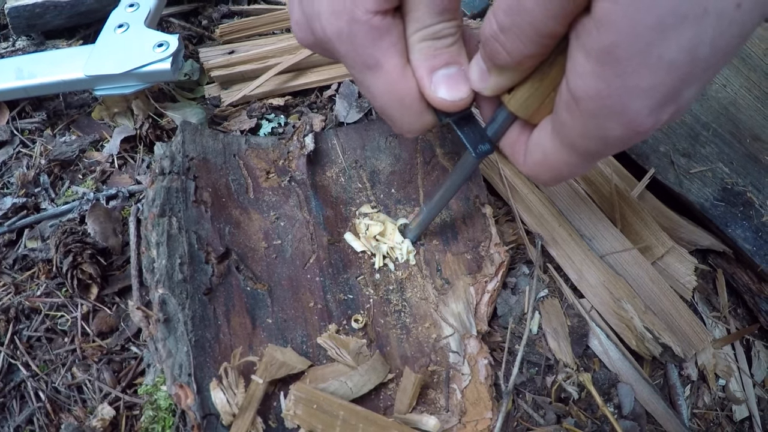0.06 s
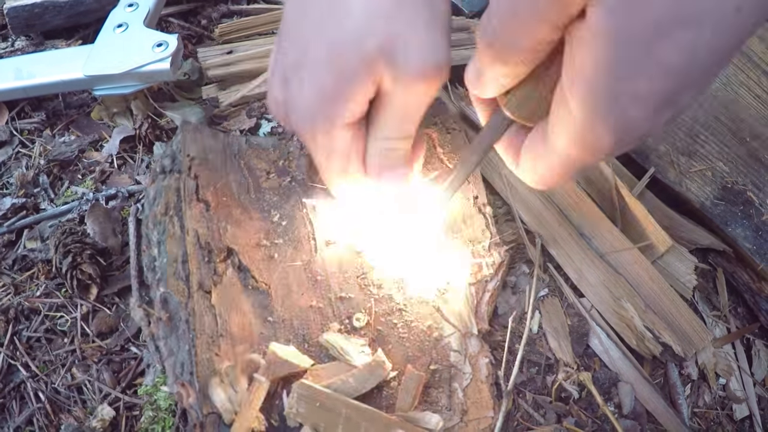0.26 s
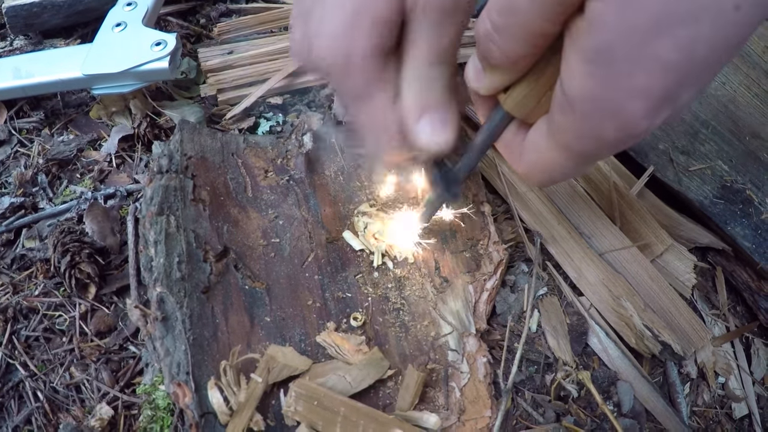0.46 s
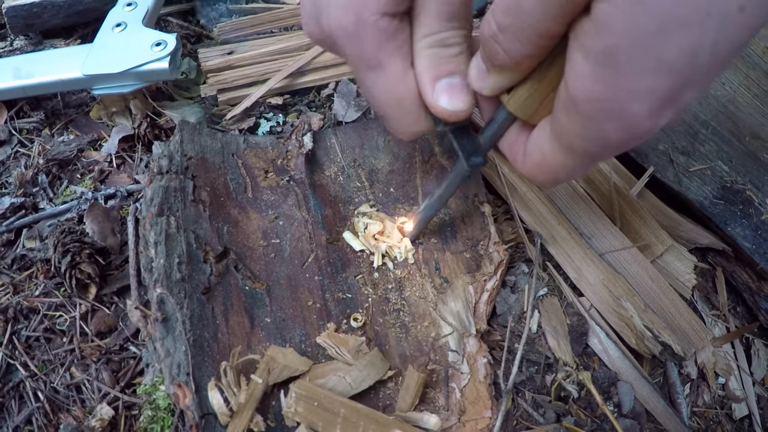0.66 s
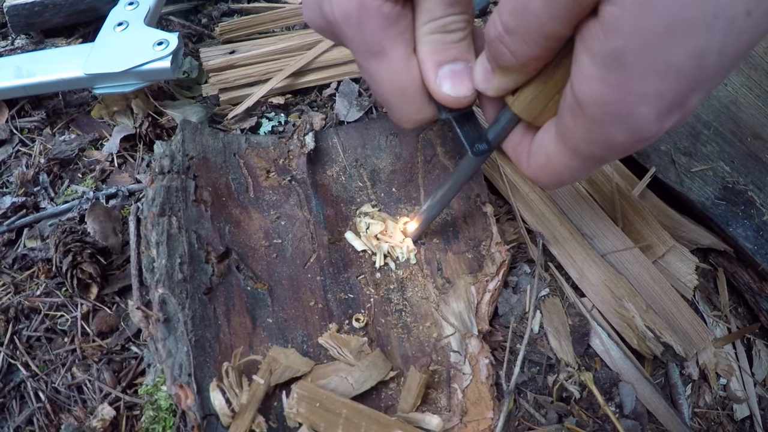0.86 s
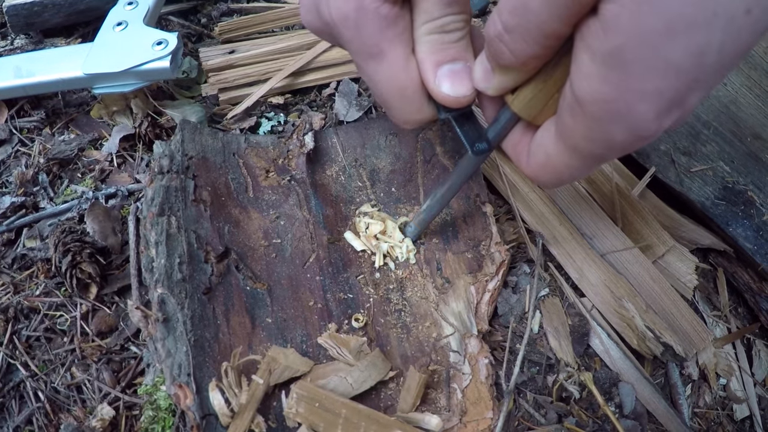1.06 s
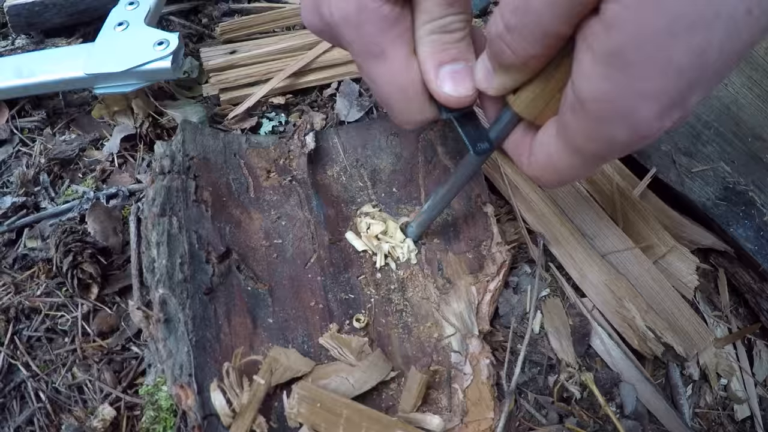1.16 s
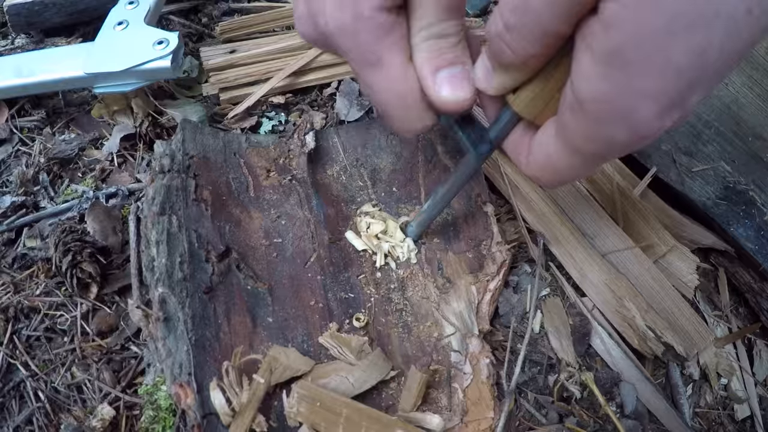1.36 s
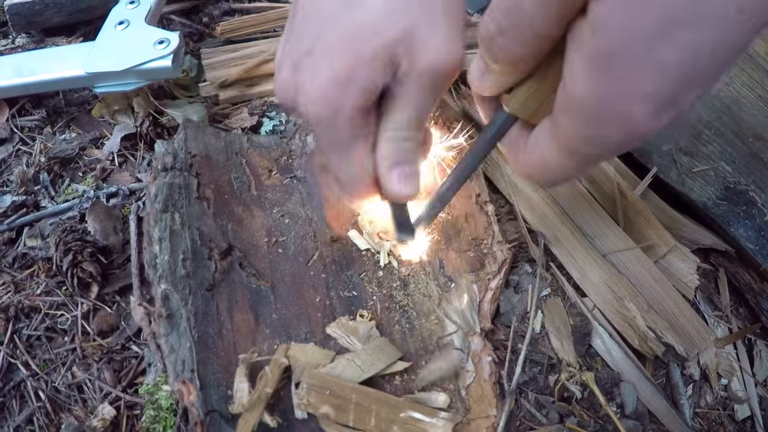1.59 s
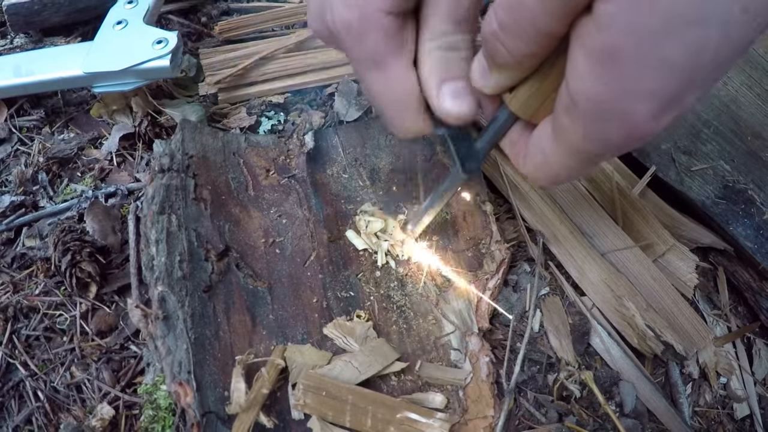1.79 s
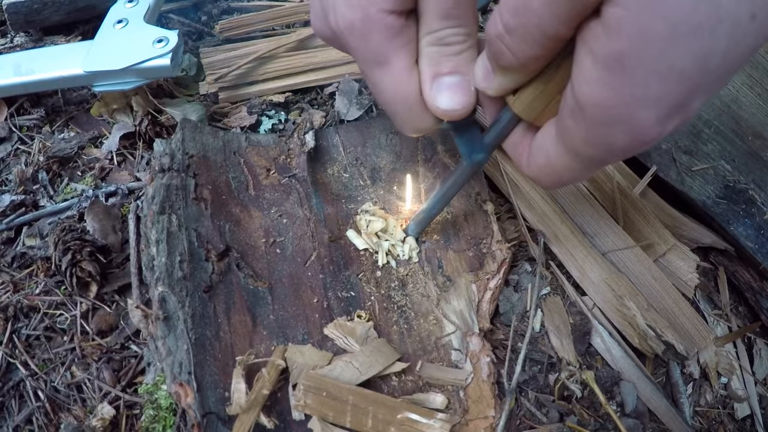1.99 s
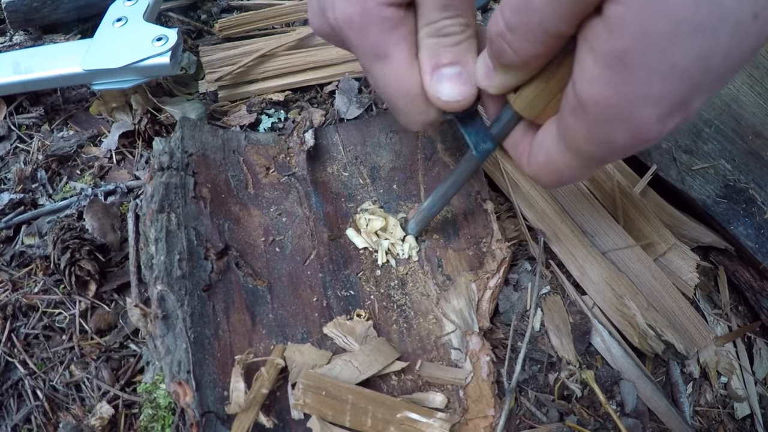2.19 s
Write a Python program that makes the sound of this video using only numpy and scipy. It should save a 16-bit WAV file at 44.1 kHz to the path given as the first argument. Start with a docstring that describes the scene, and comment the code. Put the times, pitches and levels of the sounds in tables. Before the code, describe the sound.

Fire steel strokes heard very close and dry outdoors: soft hand knocks on bark, a scrape flaring into crackling sparks, a near pause, then a second harder stroke, a tiny squeak and stray sputters.

```python
"""Quiet forest floor, microphone close to a fire steel: faint air and a low rumble lie under the take.
First the hands knock and rub on bark, and the striker slides down the rod with a thin hiss of slips.
Then it bites: the shavings flare as rasping fizz and whoosh, and burn off in a shower of noise bursts.
Stray sparks sputter and pop during and after it, and a second stroke slides, flares and showers again.
As that shower thins, a high wavering tone squeaks as the striker is drawn back; last stray sparks follow."""
import sys
import numpy as np
from scipy import signal
from scipy.fft import rfft, irfft, next_fast_len
from scipy.io import wavfile
from scipy.ndimage import uniform_filter1d, map_coordinates

SR = 44100
rng = np.random.default_rng(int(sys.argv[2]) if len(sys.argv) > 2 else 0)


def store_pcm(level_fs):
    """Save levels as 16-bit WAV."""
    pcm = np.round(np.clip(level_fs, -1, 1) * 32767).astype(np.int16)
    wavfile.write(sys.argv[1], SR, np.atleast_2d(pcm).T)


N = 98828
T = np.arange(N) / SR  # time (s)
FLICKER_DB = 1.5  # random level flicker shared by flares and showers


def amp(db):
    """Decibels to gain."""
    return 10 ** (np.asarray(db) / 20)


def unit(x):
    """Scaled to rms 1."""
    return x / np.sqrt(np.mean(x ** 2) + 1e-20)


def wobble(rate):
    """A smooth random curve, rate knots a second."""
    knots = rng.standard_normal(int(N * rate / SR) + 4)
    return map_coordinates(knots, [T * rate])


def level_curve(rows):
    """Level in dB drawn through (t/s, level/dB) rows, as good as silent outside them."""
    return np.interp(T, *np.transpose(rows), left=-120, right=-120)


def ring(points, size=8192):
    """Causal minimum-phase impulse response of energy 1 with the given (f/Hz, level/dB) spectrum."""
    hz, db = np.transpose(points)
    f = np.fft.rfftfreq(size, 1 / SR) + 1
    gain = amp(np.interp(np.log(f), np.log(hz + 1), db))
    # folding the cepstrum forward in time makes the response causal
    cepstrum = irfft(np.log(np.maximum(gain, 1e-6)))
    cepstrum[1:size // 2] *= 2
    cepstrum[size // 2 + 1:] = 0
    response = irfft(np.exp(rfft(cepstrum)))
    return response / np.linalg.norm(response)


def through(x, response):
    """x convolved with a response."""
    return signal.fftconvolve(x, response)[:N]


def lowpass(x, hz):
    """Second-order low-pass."""
    sos = signal.butter(2, min(hz, SR / 2 - 1), fs=SR, output='sos')
    return signal.sosfilt(sos, x)


def noise(points):
    """Coloured noise of rms 1."""
    response = ring(points)
    white = rng.standard_normal(N + len(response) - 1)
    return unit(signal.fftconvolve(white, response, 'valid'))


def grains(per_s, spread_db, even_s=0.0036):
    """Random impulses of uneven size, with rms near 1 over every even_s."""
    hit = rng.random(N) < per_s / SR
    size = amp(spread_db * np.clip(rng.standard_normal(N), -2, 2))
    x = hit * size * np.sign(rng.standard_normal(N))
    power = np.abs(uniform_filter1d(x ** 2, max(int(even_s * SR), 2)))
    return x / np.sqrt(power + 1e-4)


def gate(start, length, attack, release):
    """Linear attack, hold until start + length, exponential release."""
    fade = np.exp(-np.maximum(T - start - length, 0) / release)
    return np.clip((T - start) / attack, 0, 1) * fade


def swell(peak, rise, fall):
    """Exponential rise and fall around a peak."""
    return np.exp(-np.maximum((peak - T) / rise, (T - peak) / fall))


# borders between big dull sparks and small bright ones: f/Hz
REGISTER_BORDERS = [900, 1900, 3400, 5500, 9500]


def patchwork(source):
    """A fresh draw of the source in each register, so that its colour keeps shifting."""
    size = next_fast_len(N + SR // 8)
    f = np.fft.rfftfreq(size, 1 / SR)
    # share of the power that lies below each border
    below = [0 * f] + [1 / (1 + (f / hz) ** 6) for hz in sorted(REGISTER_BORDERS)] + [1 + 0 * f]
    total = np.zeros(N)
    for lower, upper in zip(below, below[1:]):
        band_gain = np.sqrt(np.abs(upper - lower))
        total += irfft(rfft(source(), size) * band_gain, size)[:N]
    return total


# still air among the trees: f/Hz, level/dB per Hz
AIR_SPECTRUM = [(150, -43), (250, -11.5), (434, -4), (781, -10.5), (837, -10.5), (1950, -10), (2160, -10),
                (2490, -10.5), (8620, -20), (15500, -26.5)]
# low rumble under the air: f/Hz, level/dB per Hz
RUMBLE_SPECTRUM = [(12, -42), (20, -10), (38, 2), (103, -3.5), (140, -7.5), (177, -14), (219, -20),
                   (245, -20), (400, -24.5), (520, -76), (880, -120)]
AIR_DB, RUMBLE_DB = -51.5, -39.5


def forest_floor():
    """Still air and a low rumble, two coloured noises whose levels drift a little."""
    air = amp(AIR_DB + 1.1 * wobble(3.06)) * noise(AIR_SPECTRUM)
    rumble = amp(RUMBLE_DB + 0.59 * wobble(8.26)) * noise(RUMBLE_SPECTRUM)
    return air + rumble


def tail(t60):
    """A dying scatter of echoes as decaying noise, energy 1; t60 is the time to fall 60 dB (s)."""
    t = T[:SR // 2]
    scatter = rng.standard_normal(len(t)) * amp(-60 * t / t60) * (t > .0003)
    return scatter / np.linalg.norm(scatter)


NEAR_DB, NEAR_T60_S = -12, 0.014
WOODS_DB, WOODS_T60_S = -24, 0.3


def echoes(close_sound):
    """A short scatter off hands and bark, and the longer, fainter answer of the trees."""
    near = amp(NEAR_DB) * through(close_sound, tail(NEAR_T60_S))
    woods = amp(WOODS_DB) * through(close_sound, tail(WOODS_T60_S))
    return near + woods


# the hands bump the bark: t/s, level/dB, low-pass corner f/Hz
BUMPS_ON_BARK = [(0.028, -31.5, 120), (.105, -33.5, 127), (.262, -23, 202), (1.18, -45, 1500),
                 (1.39, -39.5, 2000), (1.521, -12.5, 600), (2.07, -40.5, 1800)]
# the knocked bark: f/Hz, level/dB per Hz
BARK_SPECTRUM = [(30, -25), (90, -2), (160, 8), (280, -1), (450, -2), (1100, -2), (3000, -7)]
# the hands rub and shift on the wood: start t/s, length/s, level/dB
RUBS_ON_WOOD = [(0.136, 0.44, -39), (.69, .08, -52.5), (1.398, 0.29, -35), (1.712, 0.15, -44)]
# the rubbing: f/Hz, level/dB per Hz
RUB_SPECTRUM = [(60, -1.5), (150, 4.5), (270, -5), (430, -2), (600, -9.5), (850, -7), (1400, -12.5),
                (3000, -31.5)]
BUMP_FALL_S, RUB_ATTACK_S, RUB_RELEASE_S = 0.0042, .015, 0.032


def hands():
    """Knocks and soft rubbing on the slab of bark: short low-passed and longer uneven noise."""
    knocks = np.zeros(N)
    for start, db, corner_hz in BUMPS_ON_BARK:
        thud = unit(lowpass(noise(BARK_SPECTRUM), corner_hz))
        knocks += thud * amp(db) * gate(start, 0.0053, 0.0013, BUMP_FALL_S)
    rubbing = sum(amp(db) * gate(start, length, RUB_ATTACK_S, RUB_RELEASE_S)
                  for start, length, db in RUBS_ON_WOOD)
    return knocks + rubbing * amp(1.2 * wobble(49.7)) * noise(RUB_SPECTRUM)


# the squeak: t/s, pitch f/Hz, level/dB
SQUEAK_COURSE = [(1.714, 7860, -48), (1.717, 7670, -12), (1.721, 7640, -14.5), (1.726, 7850, -13.5),
                 (1.734, 7950, -25), (1.742, 7580, -41)]
SQUEAK_WAVER_HZ, OVERTONE_DB = 170, -12  # random pitch waver; octave relative to the fundamental


def squeak():
    """Steel that sticks and slips for a moment: a high wavering sine and its octave."""
    s, hz, db = np.transpose(SQUEAK_COURSE)
    pitch_hz = np.interp(T, s, hz) + SQUEAK_WAVER_HZ * wobble(600)
    phase = 2 * np.pi * np.cumsum(pitch_hz) / SR
    level = amp(level_curve(np.transpose([s, db])) + wobble(403))
    tone = np.sin(phase) + amp(OVERTONE_DB) * np.sin(2 * phase)
    return np.sqrt(2) * level * tone  # sqrt(2) gives the fundamental an rms of level


# the striker sliding on the rod: start t/s, length/s, mid-slide level/dB
STRIKER_SLIDES = [(0.154, 0.1, -21.5), (1.399, .08, -24.5)]
# rod and striker: f/Hz, level/dB per Hz
STEEL_SPECTRUM = [(100, -2.5), (300, -1), (600, -2.5), (850, -0.5), (1200, -2.5), (1750, -14), (2300, -11),
                  (2600, -4.5), (3100, -13), (3900, 1), (4400, -3), (5100, 4.5), (5700, -5.5), (6600, 0.5),
                  (8200, -12.5), (10000, -4), (11300, -9.5), (13500, -2.5), (15500, -9.5)]
SLIDE_ATTACK_S, SLIDE_RELEASE_S, SLIDE_SWELL_DB_PER_S = 0.014, 0.013, 25
SLIDE_TREBLE_HZ, TREBLE_ATTACK_S = 8000, 0.034  # the treble comes in as the striker gathers speed


def slide():
    """Fine slips of the striker's edge ring the steel, louder and brighter as it gathers speed."""
    force, speed = np.zeros(N), np.zeros(N)
    for start, length, db in STRIKER_SLIDES:
        from_middle = np.clip(T - start - length / 2, -length, length / 2)
        level = amp(db + SLIDE_SWELL_DB_PER_S * from_middle)
        force += level * gate(start, length, SLIDE_ATTACK_S, SLIDE_RELEASE_S)
        speed += gate(start, 2 * length, TREBLE_ATTACK_S, SLIDE_RELEASE_S)
    texture = patchwork(lambda: amp(3.5 * wobble(90)) * grains(6000, spread_db=5.5))
    slips = force * amp(1.2 * wobble(130)) * texture
    # low-passed forwards and backwards, so that dull and treble stay aligned
    dull = lowpass(lowpass(slips, SLIDE_TREBLE_HZ)[::-1], SLIDE_TREBLE_HZ)[::-1]
    treble = slips - dull
    return through(dull + speed * treble, ring(STEEL_SPECTRUM))


# stray sparks that sputter: start t/s, length/s, crackle level/dB, sizzle level/dB
STRAY_SPUTTERS = [(0.665, 0.0062, -26.5, -33.5), (.674, 0.0047, -30, -39), (0.697, 0.0033, -40, -46),
                  (0.732, 0.011, -46.5, -75), (0.857, 0.013, -48.5, -53), (0.89, 0.0056, -39.5, -44),
                  (1.7682, 0.0029, -17.5, -31), (1.785, 0.004, -23.5, -32), (1.82, 0.017, -23, -31),
                  (1.841, 0.015, -39.5, -47), (1.875, 0.0089, -41, -46), (1.924, .004, -38, -54),
                  (2.002, 0.0047, -21.5, -39), (2.014, 0.0093, -18, -39), (2.025, 0.016, -33, -50),
                  (2.069, 0.0032, -39.5, -50), (2.2115, .001, -50, -36.5), (2.2365, 0.0017, -29.5, -36)]
# single sparks that burst: t/s, peak level/dB
STRAY_POPS = [(0.3284, 0), (0.3455, 2), (0.389, -2), (0.3985, 5.5), (0.4541, -2), (.498, 0.5), (0.5227, 11),
              (0.5288, -8), (0.5487, -5), (0.5698, 1.5), (0.5843, -7.5), (0.6668, -5), (1.4264, -6.5),
              (1.482, 7), (1.5996, 1), (1.6156, 13), (1.636, -14), (1.682, -10), (1.8034, -8), (1.8254, -2),
              (1.8317, -0.5), (1.8613, -20), (1.928, -20), (2.0039, -22), (2.0157, 1), (2.0209, 5.5)]
# a sputtering spark: f/Hz, level/dB per Hz
SNAP_SPECTRUM = [(100, -15), (700, -12), (1100, -4.5), (1700, -1), (2500, -7), (4200, 2), (5900, -5.5),
                 (7500, -3), (8800, -22), (15500, -17)]
# the burst of a single spark: f/Hz, level/dB per Hz
CRACK_SPECTRUM = [(100, -39), (700, -23), (1300, -2), (2500, -2), (4200, 3.5), (6500, -1), (9000, -10),
                  (15500, -10.5)]
# the smallest sparks, here and in the showers: f/Hz, level/dB per Hz
SIZZLE_SPECTRUM = [(2000, -30), (7000, -15), (10000, 6), (12000, 3), (15500, -3)]
SPUTTER_ATTACK_S, SPUTTER_FALL_S, SPUTTER_PER_S = 0.00026, .0015, 2500  # last: impulses a second


def strays():
    """Lone sparks: short runs of impulses with a thin noise sizzle, and single sharp pops."""
    crackle_level, sizzle_level = np.zeros(N), np.zeros(N)
    for start, length, crackle_db, sizzle_db in STRAY_SPUTTERS:
        envelope = gate(start, length, SPUTTER_ATTACK_S, SPUTTER_FALL_S)
        crackle_level += amp(crackle_db) * envelope
        sizzle_level += amp(sizzle_db) * envelope
    snaps = crackle_level * grains(SPUTTER_PER_S, spread_db=0.5, even_s=.004)
    crackle = through(snaps, ring(SNAP_SPECTRUM))
    bursts, crack = np.zeros(N), ring(CRACK_SPECTRUM)
    for s, db in STRAY_POPS:
        bursts[min(round(s * SR), N - 1)] += amp(db) / np.abs(crack).max()
    return crackle + sizzle_level * noise(SIZZLE_SPECTRUM) + through(bursts, crack)


# the shavings catch fire: peak t/s, rise/s, fizz fall/s, fizz level/dB (0 = 3 dB over rms 1), whoosh level/dB
SHAVING_FLARES = [(0.246, 0.015, 0.03, -12, -18), (1.508, 0.021, 0.031, -16, -18)]
# the rasping fizz: f/Hz, level/dB per Hz
FIZZ_SPECTRUM = [(300, -14.5), (900, 0.5), (1400, 6), (2200, -5.5), (3400, -12), (5500, -7.5), (7500, -5.5),
                 (10000, 0), (11500, -5.5), (15500, -9.5)]
# the whoosh of hot air: f/Hz, level/dB per Hz
WHOOSH_SPECTRUM = [(25, 1), (60, 3.5), (110, -3.5), (165, 0), (270, -16), (430, 0.5), (700, -10),
                   (1200, -7), (2500, -46)]
WHOOSH_LAG_S, WHOOSH_FALL_S = 0.0037, 0.039


def flare():
    """The edge bites and the shavings ignite: dense grains fizz over a noise whoosh of hot air."""
    fizz_level, whoosh_level = np.zeros(N), np.zeros(N)
    for peak, rise, fall, fizz_db, whoosh_db in SHAVING_FLARES:
        fizz_level += amp(fizz_db + 3) * swell(peak, rise, fall)
        whoosh_level += amp(whoosh_db) * swell(peak + WHOOSH_LAG_S, rise, WHOOSH_FALL_S)
    flicker = amp(FLICKER_DB * wobble(220))
    fizz = through(fizz_level * flicker * grains(8000, spread_db=7), ring(FIZZ_SPECTRUM))
    return fizz + whoosh_level * noise(WHOOSH_SPECTRUM)


# strength of the first shower of sparks: t/s, level/dB
FIRST_SHOWER = [(0.215, -26), (0.24, -12.5), (0.262, -9), (0.28, -10.5), (0.291, -14), (0.308, -8.5),
                (0.322, -12), (0.355, -19.6), (0.372, -21.5), (0.386, -19), (0.398, -23.5), (0.415, -28),
                (0.432, -24), (0.462, -21.5), (0.472, -31), (0.515, -27), (0.527, -21), (0.538, -24.5),
                (0.565, -19.5), (0.584, -22), (0.594, -32.5), (0.617, -33), (0.63, -63)]
# strength of the second shower: t/s, level/dB
SECOND_SHOWER = [(1.472, -30.5), (1.497, -13.5), (1.517, -6), (1.537, -10), (1.554, -15.5), (1.565, -14),
                 (1.585, -21), (1.597, -10), (1.607, -20.5), (1.619, -15.5), (1.631, -22.5), (1.677, -25),
                 (1.694, -17), (1.708, -19.1), (1.739, -27.5), (1.765, -28), (1.8, -30.5), (1.817, -41.5)]
# burning sparks: f/Hz, level/dB per Hz
SPARK_SPECTRUM = [(60, -3), (160, 0), (300, -8.5), (780, -13), (1000, -3), (1350, 1), (1900, -1),
                  (2250, -1.5), (2850, -2), (3400, 2.5), (4400, 1), (5600, -4.5), (7000, -6), (8500, -12.5),
                  (12000, -19.5), (15500, -17)]
SPARKS_PER_S, CROWDING_PER_DB = 6000, 0.0878  # rate at a level of -11.5 dB; powers of ten per dB
SIZZLE_DB, SIZZLE_FOLLOWS = -33.5, 0.52  # sizzle when the shower is at -17 dB; dB per dB of the shower


def shower():
    """Crowds of tiny bursts over a thin noise sizzle; as the level fades they thin into a crackle."""
    level_db = np.maximum(level_curve(FIRST_SHOWER), level_curve(SECOND_SHOWER))
    per_s = SPARKS_PER_S * 10 ** (CROWDING_PER_DB * (np.maximum(level_db, -30) + 11.5))
    fine = patchwork(lambda: amp(FLICKER_DB * wobble(130)) * grains(per_s, spread_db=4.5))
    coarse = grains(per_s / 2, spread_db=5.5, even_s=0.013)
    sparks = amp(level_db + FLICKER_DB * wobble(220)) * (fine + amp(-7.5) * coarse)
    # before flicker, the sizzle stays at least 16.5 dB below the shower
    sizzle_db = np.minimum(SIZZLE_DB + SIZZLE_FOLLOWS * (level_db + 17), level_db - 16.5)
    sizzle = amp(sizzle_db + FLICKER_DB * wobble(150)) * noise(SIZZLE_SPECTRUM)
    return through(sparks, ring(SPARK_SPECTRUM)) + sizzle


def scene():
    """The fire steel close by, its near and far echoes, and the quiet forest floor behind."""
    close_sound = hands() + squeak() + slide() + strays() + flare() + shower()
    return (forest_floor() + echoes(close_sound) + close_sound)[None]


CLIP_TOP, TOP_HZ = 1.0, 15500  # clipping level (full scale = 1); band limit


def record(dry):
    """The recorder rounds off the highest peaks, then keeps nothing above its band limit."""
    clipped = dry / (1 + np.abs(dry / CLIP_TOP) ** 8) ** (1 / 8)
    size = next_fast_len(N + SR // 4)
    in_band = np.fft.rfftfreq(size, 1 / SR) < TOP_HZ
    return irfft(rfft(clipped, size) * in_band, size)[:, :N]


dry = scene()
out = record(dry)
store_pcm(out)
```